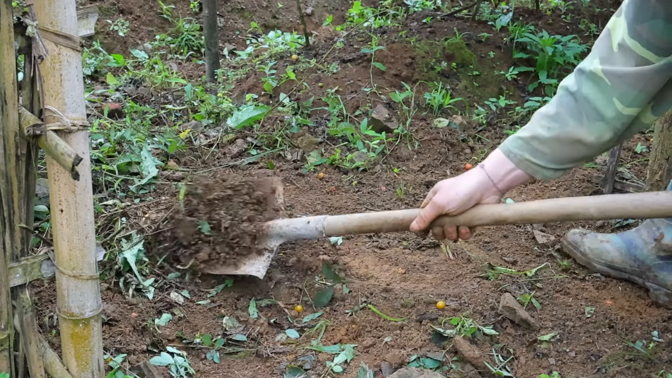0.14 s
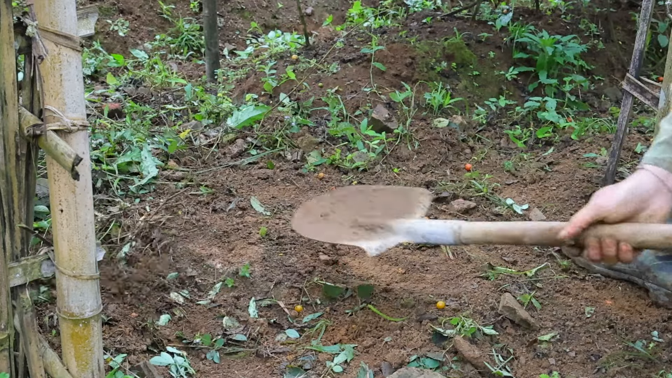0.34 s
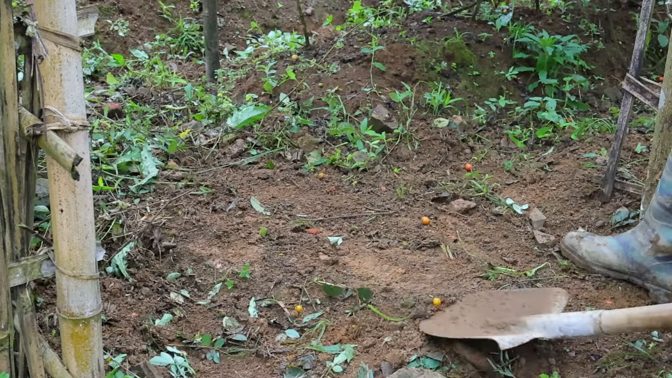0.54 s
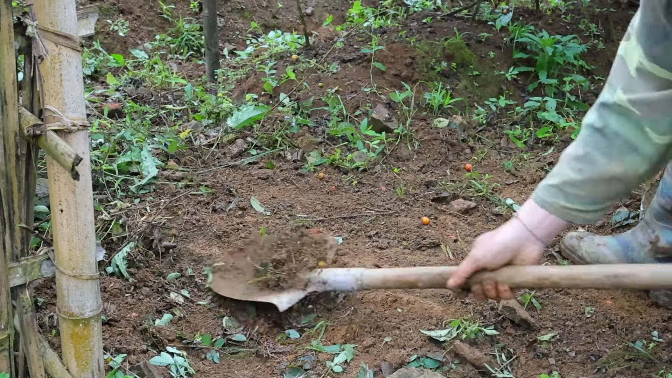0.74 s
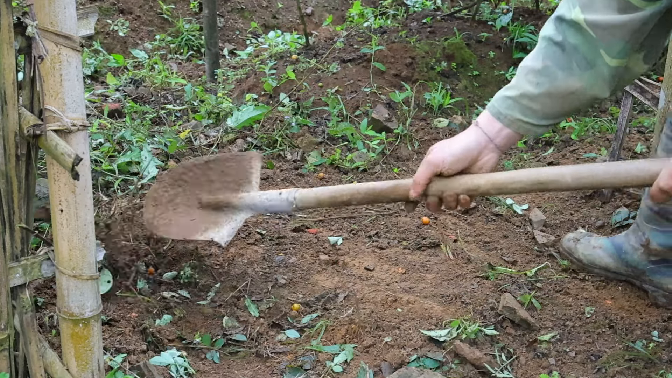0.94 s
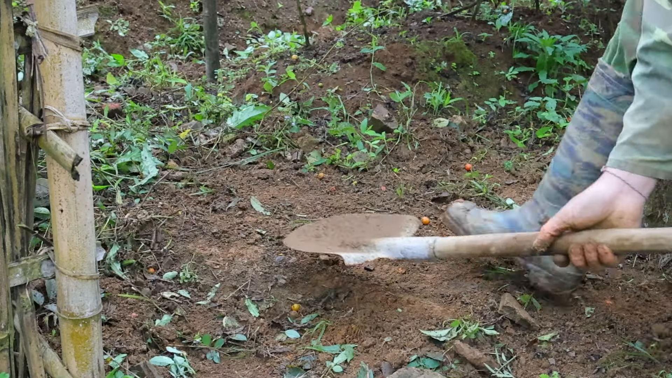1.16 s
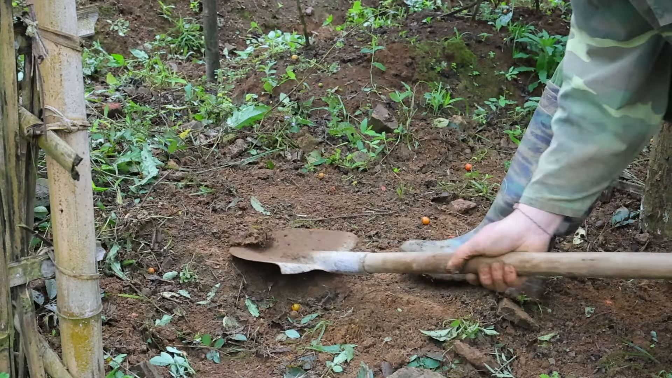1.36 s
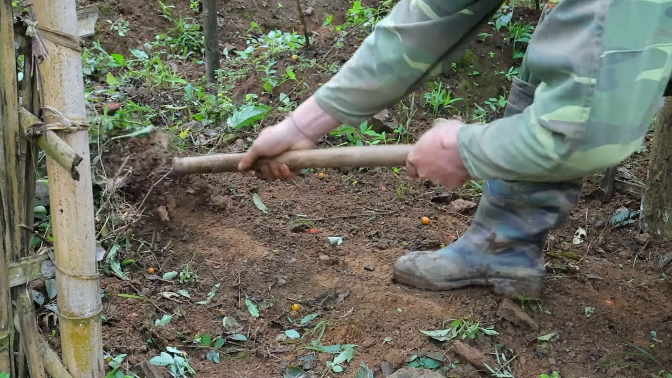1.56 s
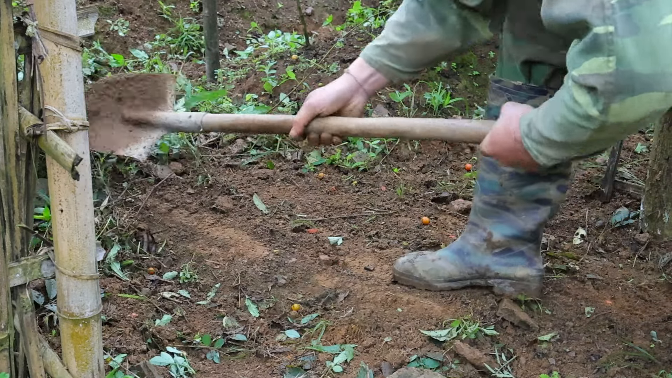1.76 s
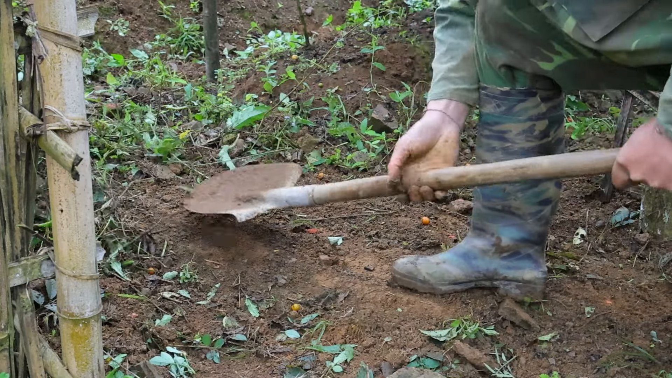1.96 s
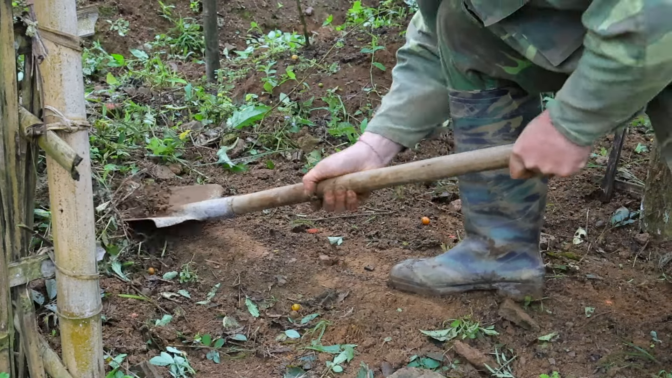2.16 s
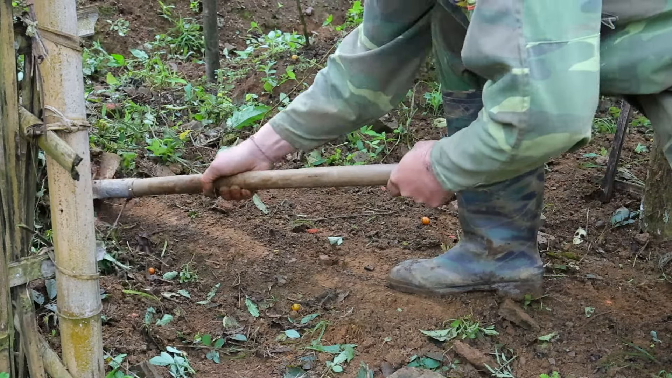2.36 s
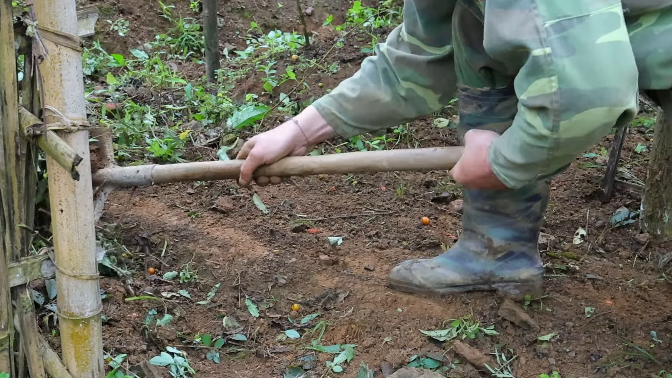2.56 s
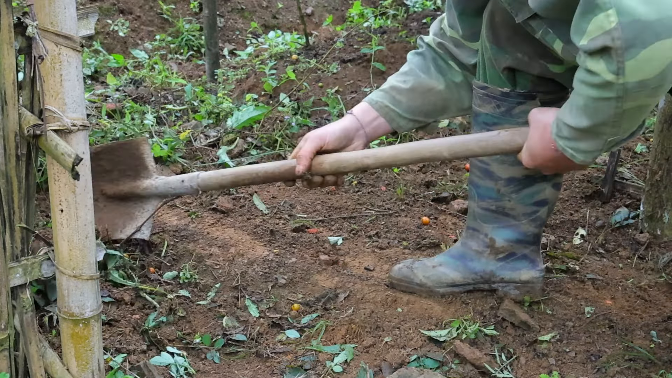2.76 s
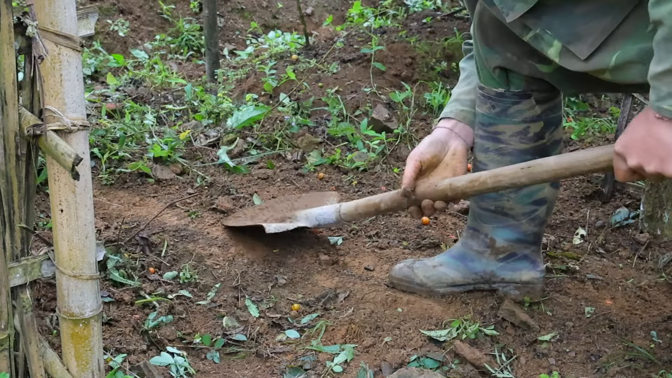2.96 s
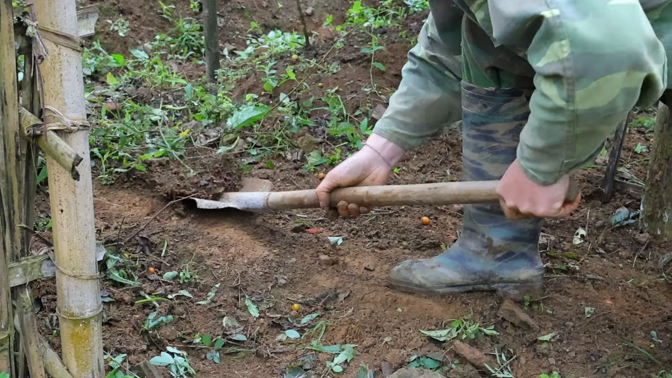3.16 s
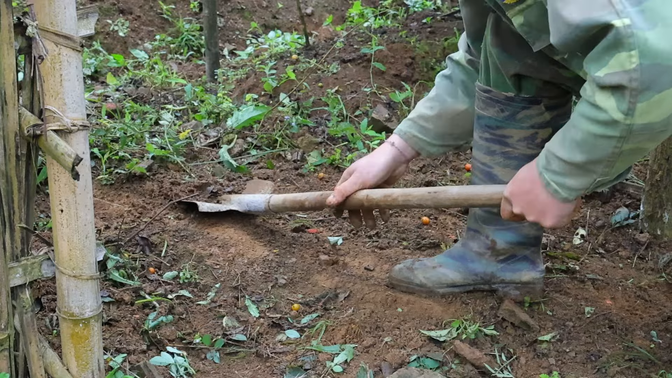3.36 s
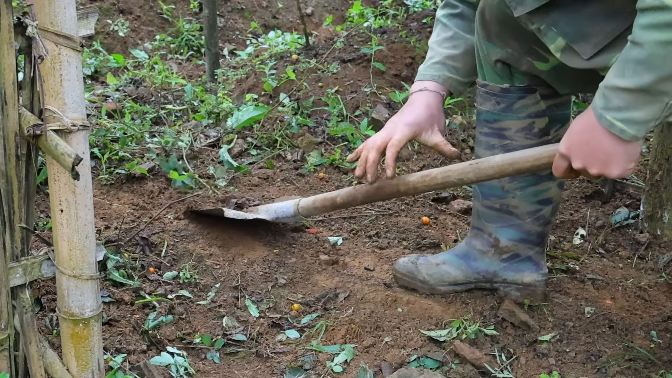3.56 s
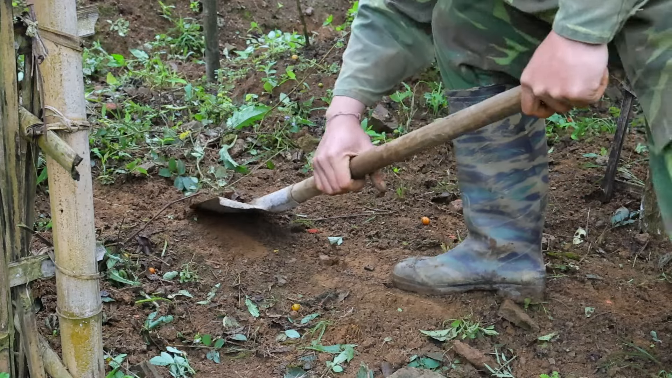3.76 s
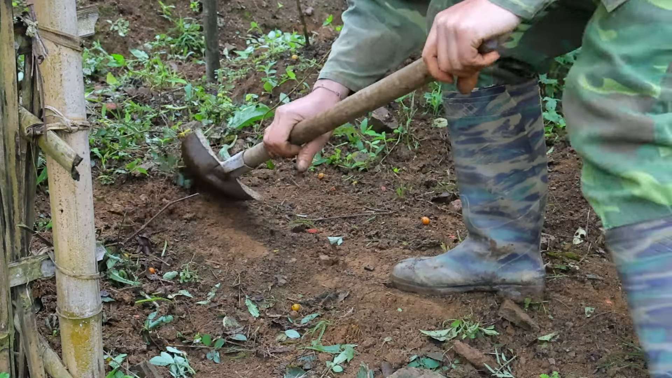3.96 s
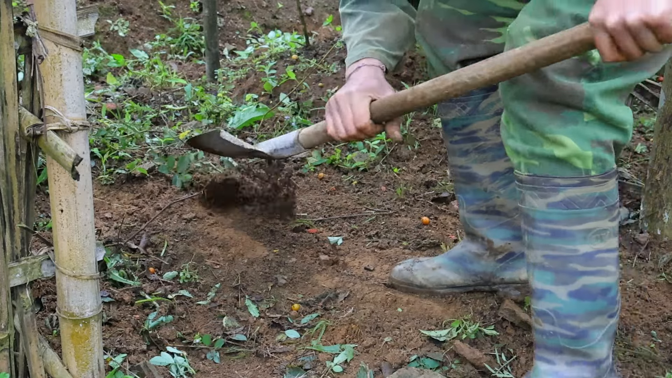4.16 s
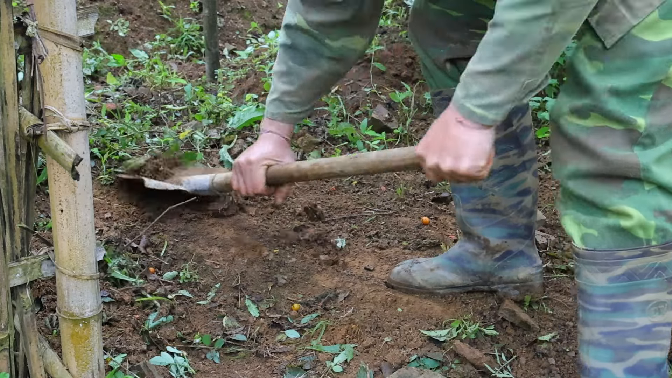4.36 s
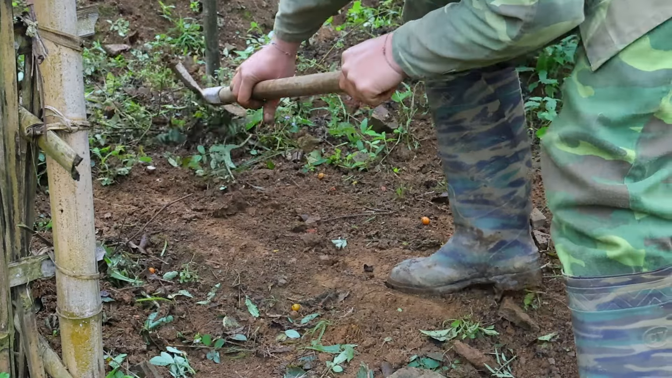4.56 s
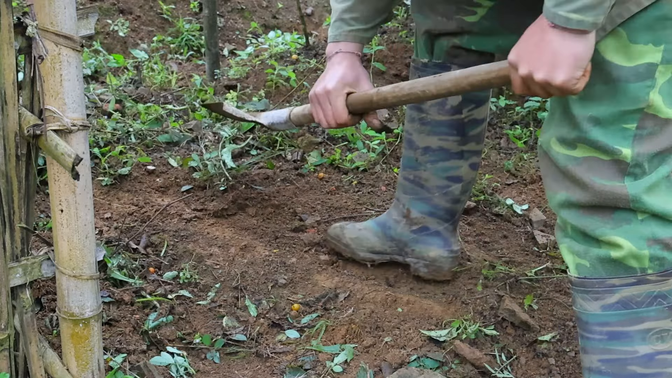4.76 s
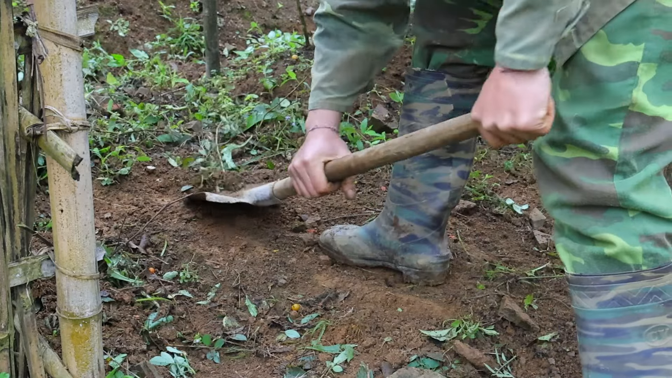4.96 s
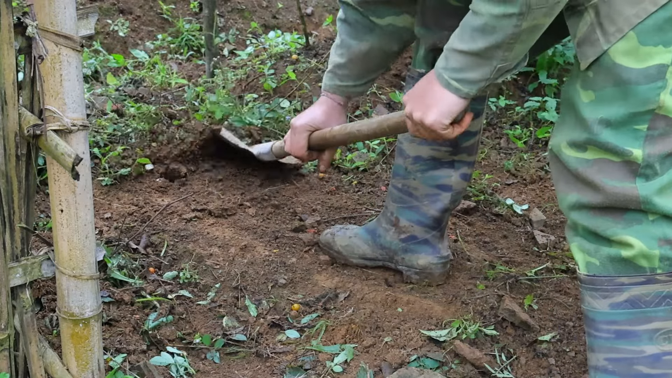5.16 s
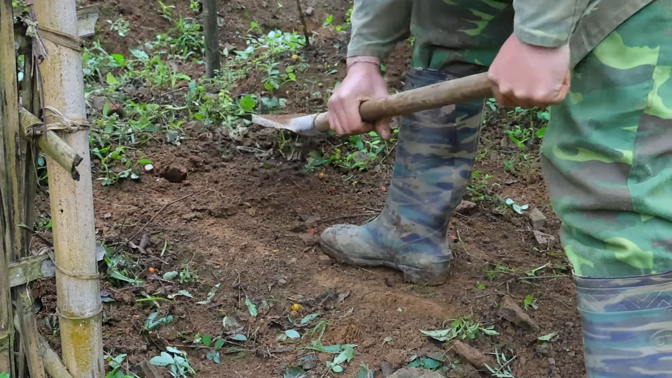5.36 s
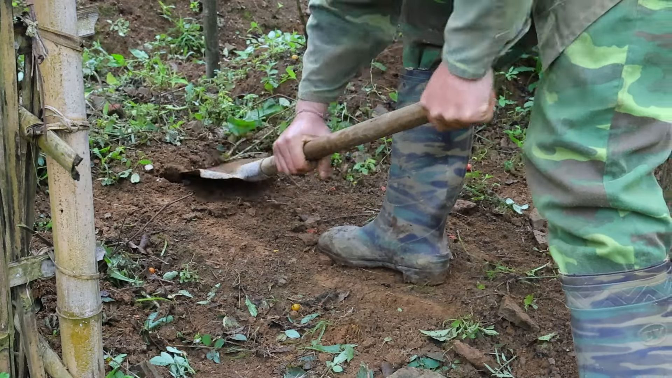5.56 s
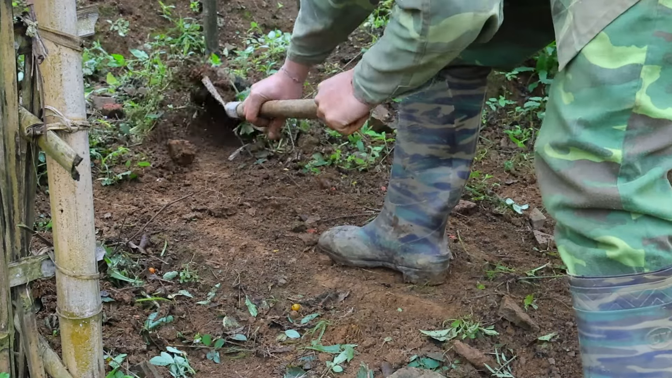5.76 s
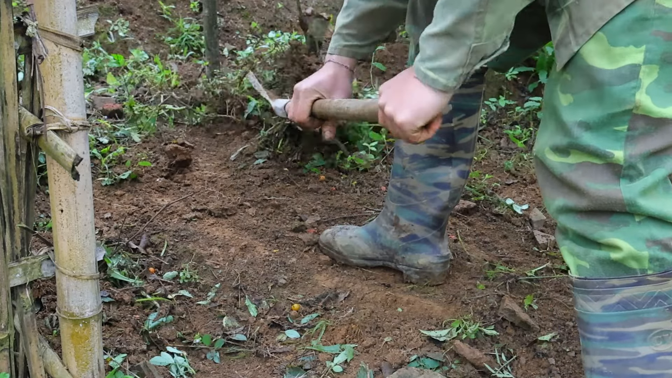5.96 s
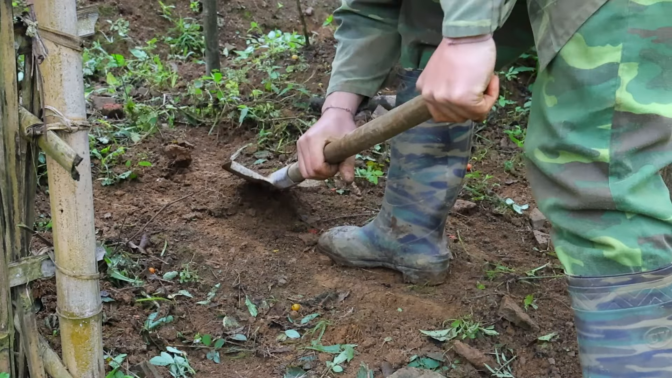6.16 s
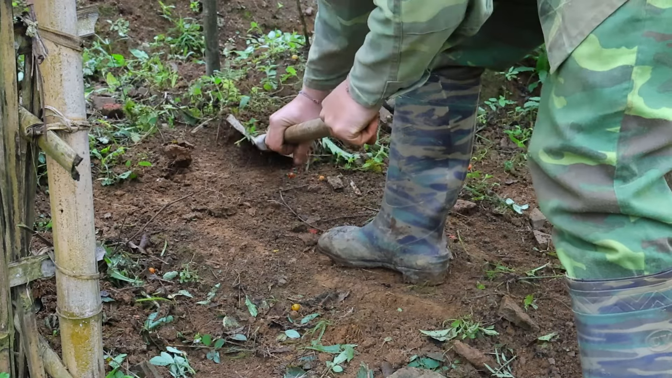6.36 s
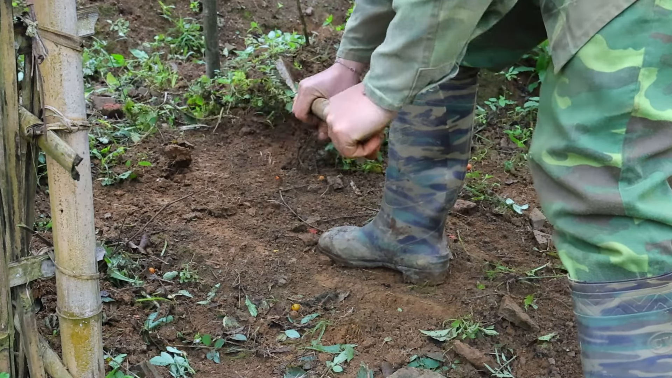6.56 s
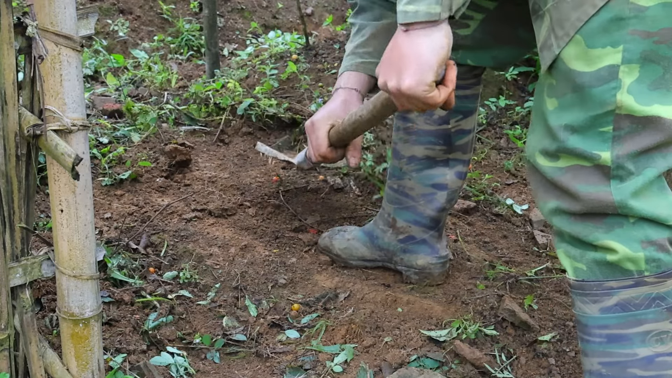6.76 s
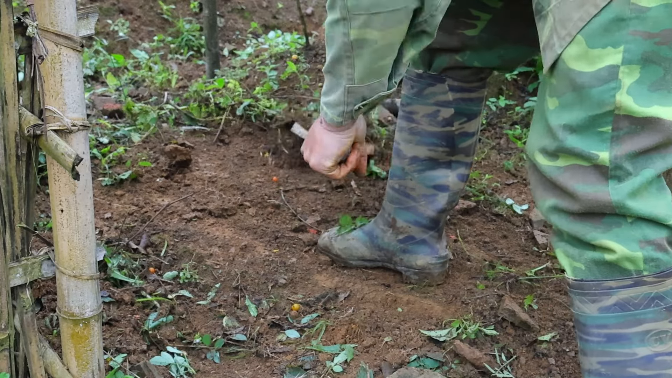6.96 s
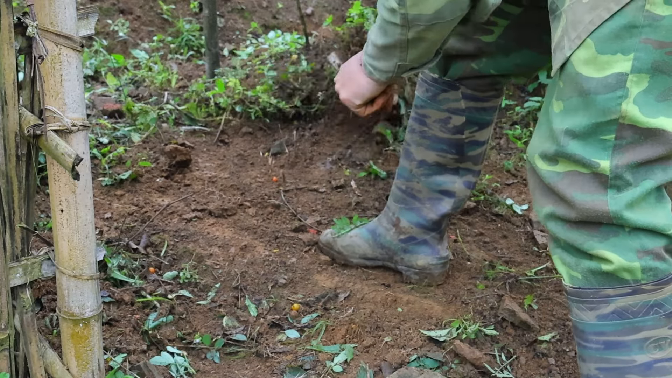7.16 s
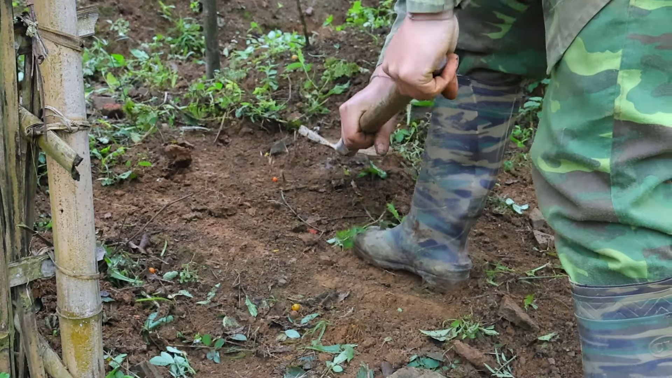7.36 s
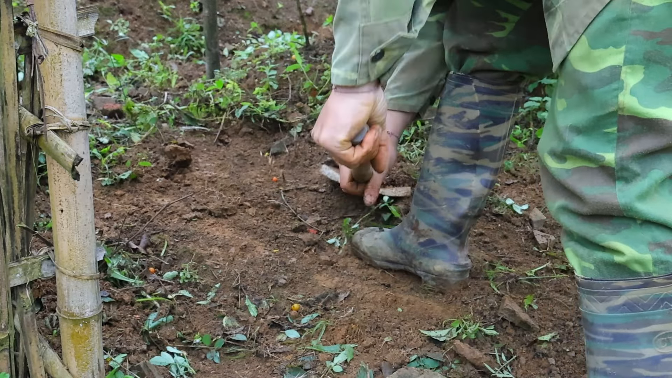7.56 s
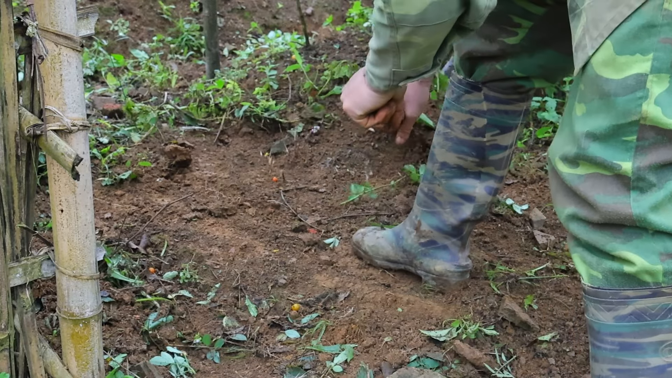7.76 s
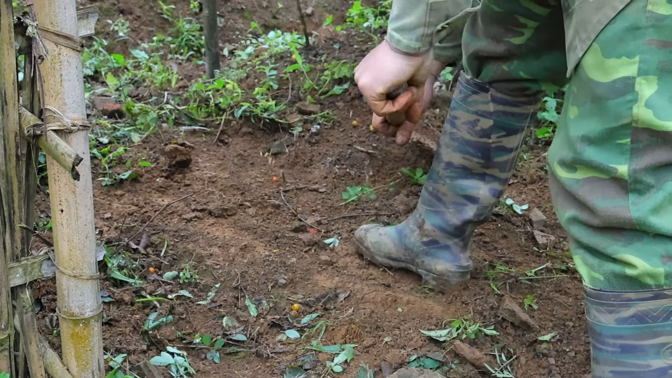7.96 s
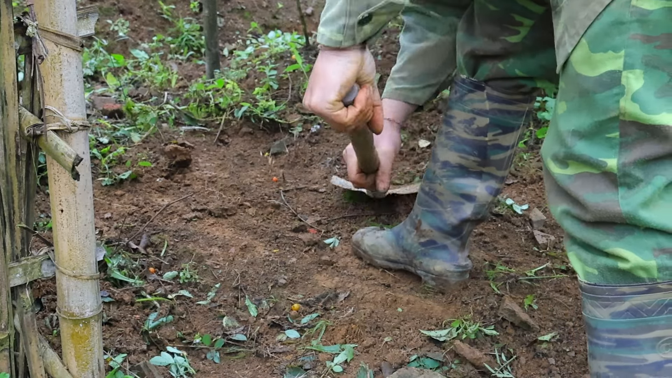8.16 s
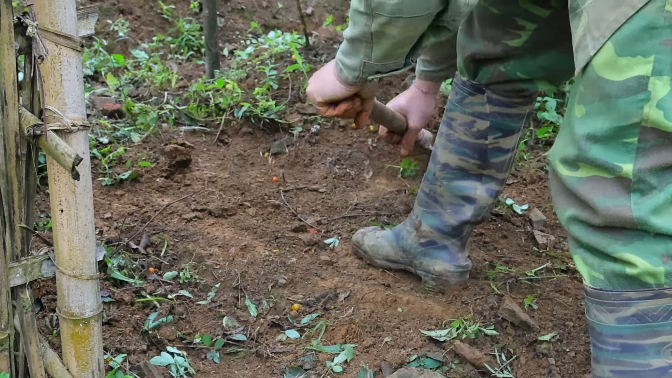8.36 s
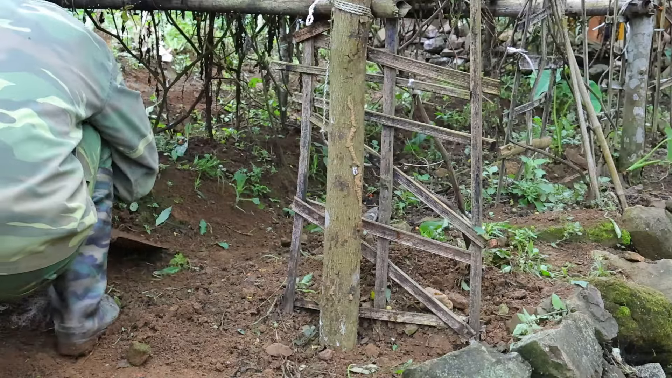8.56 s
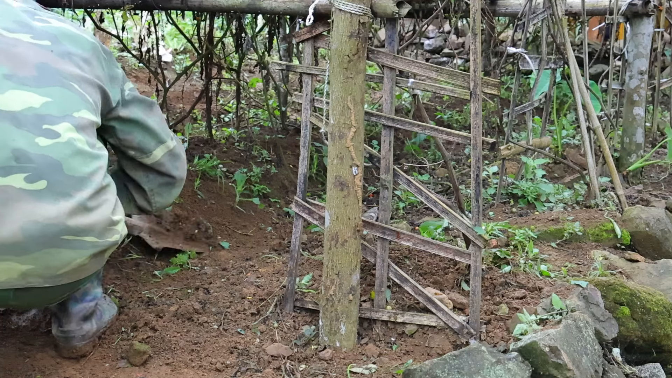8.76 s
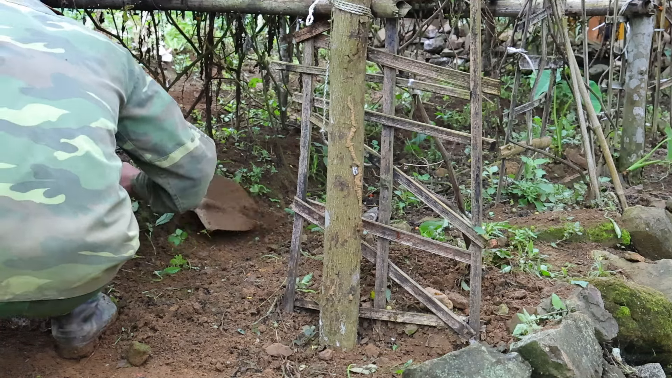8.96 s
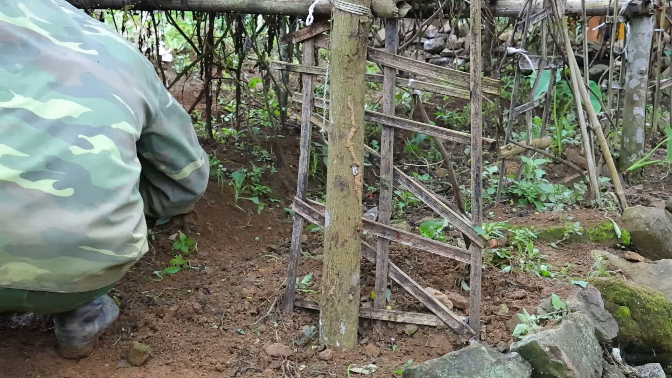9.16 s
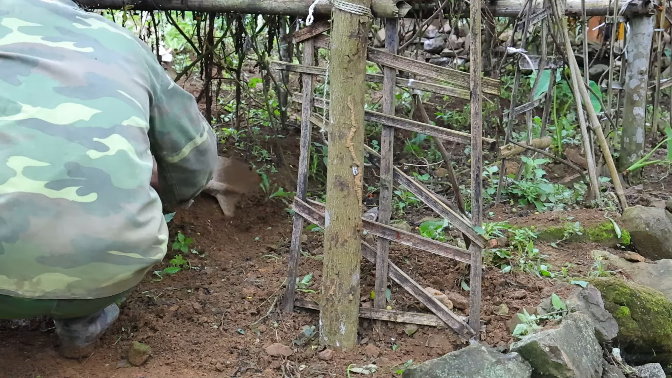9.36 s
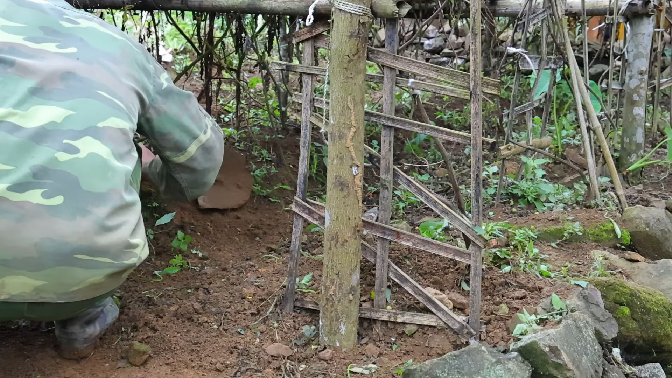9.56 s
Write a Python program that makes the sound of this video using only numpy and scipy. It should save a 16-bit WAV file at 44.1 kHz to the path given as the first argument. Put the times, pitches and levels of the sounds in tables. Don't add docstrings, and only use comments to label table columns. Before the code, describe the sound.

A close stereo microphone hears a spade or hoe working a quiet garden bed. Longer scrapes come first, with stones cracking and the freed blade ringing briefly, then shorter, harder chops, each a crunch with a damped metallic knock. Loose leaves and crumbs rustle in the gaps, rubber boots creak and step, and a faint low drone passes far away. The last strokes are lighter, with a small bright clank against rock.

```python
import sys
import numpy as np
from scipy import signal
from scipy.fft import rfft, irfft, next_fast_len
from scipy.io import wavfile
from scipy.ndimage import uniform_filter1d

SR = 44100
rng = np.random.default_rng(int(sys.argv[2]) if len(sys.argv) > 2 else 0)


def log_audio(samples):
    frames = np.atleast_2d(samples).T
    limited = np.clip(frames, -1, 1)
    pcm = np.round(limited * 32767).astype(np.int16)
    wavfile.write(sys.argv[1], SR, pcm)


def how_loud(loudness_db):
    steps = np.asarray(loudness_db, float) / 20
    return 10 ** steps


N = 423801

# [pitch_hz, level_db]
GARDEN_SPECTRUM = [(24, -38), (40, 27), (91, -2.5), (455, 7.5), (697, -34), (918, 6), (2000, -4),
                   (5580, -18), (11000, -22), (13100, -14.5), (15800, -7)]
# [time_s, level_db]
GROUND_RUMBLE = [
    (0.0, -55.5),
    (3.77, -59),
    (5.81, -50),
    (6.05, -58.5),
    (6.45, -48.5),
    (6.69, -60.5),
    (7.79, -57),
    (8.94, -63.5),
    (9.61, -61),
]
# [start_s, peak_db, pitch_hz, t60_s]
BOOT_THUDS = [(0.604, -26.5, 284, 0.11), (1.324, -31, 110.4, 0.077), (3.246, -30.5, 112, 0.1),
              (4.227, -17, 157, 0.045), (4.237, -24, 272, 0.044), (1.636, -25.5, 70, 0.029),
              (2.14, -35, 65, .1), (4.439, -18.5, 117, 0.047), (5.68, -25, 56, 0.13),
              (4.901, -31.5, 62, 0.14), (5.113, -23.5, 112, 0.091), (8.396, -27, 277, 0.083)]
# [strongest_s, level_db, swell_s over 20 dB]
BOOT_CREAKS = [(.3, -48.5, 2.5), (.968, -46, .5), (2.95, -49.5, 2), (3.268, -48.5, -1), (3.55, -49, 0.5),
               (3.93, -44.5, 0.6), (4.19, -37, -0.37), (4.37, -37.5, 0.07), (4.555, -40.5, 0.14),
               (4.88, -41.5, 0.26), (5.198, -46, 0.7), (5.788, -32, -0.07), (6.385, -44.5, 0.5),
               (6.72, -38, -0.04), (7.418, -44, 0.3), (7.517, -42, 0.05), (7.84, -42, 0.2),
               (8.17, -50, 0.2), (8.73, -49, 1.5), (9.6, -48.5, 1)]
# [start_s, peak_db]
FALLING_CLODS = [(0.615, -7), (0.87, -18), (1.633, -24), (3.925, -19), (4.226, -22), (4.472, -5),
                 (4.496, -20), (5.111, -10), (5.666, -19.5), (6.427, -15), (6.957, -28.5), (7.014, -20),
                 (7.091, -21), (7.643, -17), (7.682, -7.5), (7.75, -17.5), (8.255, -25), (8.359, -20.5),
                 (8.409, -11), (8.563, -28.5), (9.57, -21)]
# [strongest_s, level_db, swell_s over 20 dB, sand_db re level]
LOOSE_RUSTLES = [(.19, -48, 0.4, 0.5), (.3, -56.5, 0.3, 1), (.48, -56, -0.05, 8), (1.158, -46, -0.01, 10.5),
                 (1.36, -56.5, 0.6, 4), (1.9, -52, 0, -9), (2.5, -50.5, 3.5, -1.5), (2.88, -47, 0, -1),
                 (3.454, -43, 0, 4), (3.65, -43.5, 0.07, 4.5), (3.82, -44, 0.2, 4),
                 (4.4, -42.5, 0.26, -8.5), (4.6, -53, 0.3, 8.5), (4.889, -52.5, 0.1, 10),
                 (5.25, -50, 0.7, -2), (6.1, -55.5, 1.12, 9), (7.3, -54, 1.1, 4), (8.03, -46.5, 0, -31.5),
                 (8.47, -50, -0.11, 0), (8.54, -42, -0.21, -2), (8.873, -47, 0.3, -2)]
# [strongest_s, level_db, rise_s and fall_s over 20 dB, sand_db re level]
BLADE_STROKES = [(0, -25, .05, 0.078, -5), (.624, -54, 0.027, 0.15, -23), (.708, -36.5, 0.077, 0.22, -2),
                 (.793, -36.5, 0.43, 0.052, -4), (0.892, -40, 0.27, 0.28, -3.5),
                 (1.44, -38, 0.017, 0.63, -7), (1.533, -31.5, 0.091, 0.065, 4.5),
                 (1.65, -36.5, 0.2, 0.14, 3.5), (2.305, -30, 0.22, 0.21, -2.5),
                 (3.167, -26.5, 0.042, 0.14, -8.5), (3.254, -29.5, 0.2, 0.029, -3),
                 (3.917, -39, 0.056, 0.21, 0), (4.478, -30, 0.086, 0.14, -4),
                 (5.114, -25.5, 0.044, 0.068, -10.5), (5.695, -28.5, 0.03, 0.14, 0.5),
                 (6.43, -30.5, 0.19, 0.067, -1), (7.025, -28.5, 0.11, 0.13, -5.5),
                 (7.676, -25.5, 0.042, 0.081, -4.5), (7.767, -33.5, 0.069, 0.11, -8),
                 (8.312, -23, 0.029, 0.039, 4), (8.409, -35.5, 0.25, 0.21, -1.5),
                 (9.224, -37, 0.027, 0.24, -9), (9.364, -45.5, 0.033, 0.22, 2),
                 (9.5, -40.5, 0.077, 0.052, -2.5)]
# [pitch_hz, level_db]
GRIT_SPECTRUM = [(150, -68), (250, 4.5), (654, 5), (865, -5.5), (1080, 7.5), (2020, 7), (2830, 2),
                 (5370, -4.5), (7000, -15.5), (9100, -26), (15400, -120)]
# [pitch_hz, level_db]
SAND_SPECTRUM = [(3530, -7.5), (6000, -3.5), (7250, -6), (11100, -5), (12200, -4.5), (14900, 7),
                 (16000, -20)]
# [start_s, peak_db, pitch_hz, t60_s]
SINGING_TOUCHES = [(.28, -36, 680, 0.067), (.305, -40, 2020, 0.16), (.62, -16, 3020, 0.049),
                   (.62, -16, 2036, 0.08), (.679, -29, 3750, 0.038), (.699, -9, 3850, 0.061),
                   (.965, -42, 2040, 0.24), (1.39, -44, 2010, .3), (1.495, -22.5, 1990, 0.26),
                   (1.98, -37, 760, 0.085), (2.313, -5.5, 2130, 0.036), (3.11, -38, 646, .1),
                   (3.235, -12.5, 894, 0.08), (3.485, -39, 696, 0.073), (4.155, -35, 708, 0.27),
                   (4.463, -7, 4200, 0.037), (4.498, -18, 853, 0.1), (4.549, -31, 1990, .1),
                   (4.609, -36, 2010, 0.15), (4.749, -28, 2730, 0.045), (5.051, -31, 1990, 0.09),
                   (5.083, -18, 3090, 0.066), (5.197, -35, 2070, .15), (5.246, -31, 2116, 0.063),
                   (5.404, -32.5, 764, 0.077), (5.112, -10, 1660, 0.048), (6.4275, -9, 1940, 0.037),
                   (7.028, -10, 1250, 0.063), (7.0905, -8, 1940, 0.034), (7.185, -42, 993, 0.23),
                   (7.32, -43, 710, .15), (6.4026, -1.5, 1855, 0.024), (6.43, -21, 855, 0.073),
                   (6.715, -39, 850, 0.13), (.744, -21, 13500, 0.034), (6.972, -18, 2053, 0.13),
                   (6.99, -26, 2070, 0.12), (8.295, -11, 1343, 0.12), (8.315, -17.5, 1990, 0.092),
                   (8.256, -24, 2030, .04), (8.563, -25.5, 3080, 0.053), (8.57, -26.5, 1570, 0.12),
                   (9.26, -35, 2180, 0.15), (9.41, -40, 2030, .1), (9.443, -40, 984, .12),
                   (9.38, -36.5, 616, 0.074), (9.494, -30.5, 580, 0.055)]
# [start_s, peak_db, pitch_hz]
GRAIN_SNAPS = [(0.136, -13, 3050), (0.7668, -7, 3270), (0.8676, -8, 3480), (2.3391, -1, 5260),
               (2.3846, -10, 1510), (2.424, -14, 1990), (2.661, -28.5, 2200), (2.8554, -25, 1820),
               (3.158, -5, 5500), (4.2268, -16, 1300), (4.7487, -28.5, 1200), (4.8749, -22, 1240),
               (4.9012, -22, 1790), (5.0633, -8, 4000), (5.082, -4, 4500), (6.329, -30, 5000),
               (6.383, -17, 5000), (6.393, -17, 5200), (.7995, -15, 11500), (6.448, -16, 6550),
               (7.0923, -7, 5700), (7.6467, -5, 5830), (8.4163, -2, 4270), (8.4105, -6, 1700),
               (9.2152, -8.5, 4560), (9.342, -29, 4500), (9.512, -27, 6000)]
# [pitch_hz, level_db, t60_s]
LIFTED_MODES = [(538, -20, .36), (700, -22, .27), (856, -14, .23), (1254, -4, .27), (2810, -19, .09),
                (1480, -3.5, .09), (1723, -14, .18), (1965, -13, .2), (2083, -12, .06), (2250, -12, .13),
                (3580, -8, .09)]
# [pitch_hz, level_db, t60_s]
ROCK_MODES = [(1050, -8, .03), (1556, -15, .06), (2073, -2, .09), (2180, -8, .04), (2450, -18, .08),
              (2853, -19, .06), (4200, -6, .035)]
# [start_s, level_db]
AIR_RINGS = [
    (0.623, -26.5),
    (.869, -5.5),
    (9.2153, -5),
]
# [pitch_hz, width_hz, level_db]
BURIED_MODES = [(540, 35, -44), (885, 7.9, -5.5), (1343, 42, -2), (2070, 100, -6.5), (2950, 47, -4),
                (3320, 290, 12.5), (4463, 270, 11), (5488, 57, 2), (7850, 110, -49.5)]
# [pitch_hz, width_hz, level_db]
SPINE_MODES = [(2030, 60, -6), (2120, 60, -9)]
# [time_s, level_db]
BLADE_CLEANNESS = [(0, 3), (.6, -0.5), (1.75, -8), (2.2, -2), (3.1, -8.5), (9.1, -8), (9.2, 4), (9.61, -7)]
# [start_s, peak_db, pitch_hz, crack_db re peak, t60_s]
STONE_BLOWS = [(0.0135, -6, 3320, -10, 0.12), (0.0267, -4, 3250, -30, 0.016),
               (0.6172, -8, 2000, -26, 0.036), (0.6996, -6, 3720, 7.5, 0.16),
               (0.8737, -8.5, 1580, -27, 0.026), (1.5294, -5.5, 1910, 6.5, 0.13),
               (1.634, 1.5, 2100, -40, 0.081), (2.293, -4, 5000, -27, 0.051), (2.3396, -9, 1860, 0, 0.14),
               (3.181, -5, 1860, -20, 0.028), (3.235, -2.5, 1840, 1, 0.053),
               (4.4633, -1.5, 1630, -14, 0.085), (5.0745, -1, 1760, -16, 0.053),
               (5.1182, -2.5, 1870, -7.5, 0.03), (5.6838, -5.5, 1680, 11, 0.11),
               (6.4278, -10.5, 1950, -2, 0.098), (7.0165, -5, 1590, 1, 0.059),
               (7.0285, -8, 1270, -24, 0.066), (7.0904, -8.5, 1840, 2, 0.058),
               (7.6463, -3, 1820, -29, 0.05), (7.6807, -2, 2070, 4.5, 0.059), (8.2985, -9.5, 3660, 4, 0.12),
               (8.4135, -1.5, 3960, 7, 0.061), (9.2145, -13, 4360, 0, 0.082)]
# [start_s, peak_db, pitch_hz, crack_db re peak]
STROKE_PEBBLES = [(0.1385, -10, 2970, 6.5), (0.713, -27, 3700, -11), (0.743, -13, 1730, -1),
                  (0.7666, -10, 2450, 2), (0.802, -15, 2060, -11), (1.494, -11, 2000, -23),
                  (1.577, -14.5, 2160, 8), (1.6097, -13.5, 2100, 3), (2.2428, -13, 2500, -4),
                  (2.3126, -10, 2080, -13), (2.3832, -17, 1480, -33), (2.4258, -18.5, 2070, -15),
                  (3.15, -7.5, 5500, 4.5), (3.158, -11.5, 2400, -10.5), (3.1679, -6.5, 3480, 5),
                  (3.203, -10.5, 1730, -10), (3.9245, -17.5, 1570, -16), (4.4348, -12.5, 2270, 11),
                  (5.0629, -8, 2050, -18), (5.084, -6, 3100, -15), (5.665, -12, 2380, -27),
                  (5.7346, -13, 1990, 0), (6.3466, -14, 1930, -3), (6.3763, -13.5, 1980, -18),
                  (6.394, -9, 1950, -1), (6.9598, -8.5, 1820, -2), (7.741, -12, 1610, -18),
                  (7.7498, -20, 2010, -23), (7.783, -14.5, 1600, -22), (8.5642, -19, 1660, -6)]
# [start_s, peak_db, pitch_hz]
FALLING_CRUMBS = [(0.0939, -22.5, 2070), (0.6786, -24.5, 1950), (1.479, -20.5, 2050), (1.6858, -18.5, 1790),
                  (1.872, -34, 1140), (2.1302, -28, 4030), (2.19, -24.5, 2400), (2.511, -20.5, 1850),
                  (2.5561, -23, 2070), (2.6615, -26.5, 1530), (2.802, -27.5, 1940), (2.8557, -24, 1590),
                  (3.8904, -21.5, 4230), (4.225, -32, 1300), (4.75, -31, 2720), (4.8752, -30, 1290),
                  (4.901, -31.5, 1680), (5.196, -24.5, 1990), (6.329, -23, 1900), (7.004, -15, 2110),
                  (7.829, -23.5, 2000), (8.256, -22, 1900), (8.8717, -22.5, 3900), (8.93, -31.5, 2480),
                  (9.279, -25.5, 2150), (9.342, -36, 4510), (9.365, -26, 3350), (9.471, -32, 5100),
                  (9.298, -25, 2600), (3.464, -27.5, 2250)]
# [start_s, peak_db, pitch_hz, crack_db re peak, t60_s]
STONE_CHIPS = [(.005, -10.5, 4000, -8, 0.062), (.035, -15, 1430, -10, 0.022), (.7135, -19, 2980, 6, .012),
               (.811, -16, 3200, 0, 0.026), (7.034, -6, 2800, -7, 0.038), (1.527, -7, 4460, -3.5, 0.076),
               (1.539, -4.5, 4630, -1, 0.025), (1.654, -12, 3000, -6, .03),
               (2.2375, -17.5, 4400, 8.5, 0.012), (2.2485, -11.5, 4540, 2, 0.056),
               (2.305, -13, 5500, 0, 0.027), (2.4853, -32.5, 1490, -26, 0.13), (9.357, -29, 3800, -5, .06),
               (3.255, -23, 2780, -3, 0.026), (3.7274, -31.5, 4500, 9.5, 0.047),
               (3.9215, -17, 4570, 3.5, 0.034), (4.237, -31, 1510, -10, 0.026),
               (4.473, -11, 4300, -16, 0.02), (4.4975, -12.5, 2580, -5, 0.04),
               (6.4235, -12, 4500, -8, 0.08), (4.5481, -31, 3200, -10, .04), (4.617, -34, 5240, 13, 0.017),
               (5.0509, -32, 3100, -15, 0.031), (5.109, -12, 5730, 0, 0.052),
               (5.2525, -32.5, 2190, -3, 0.031), (5.727, -20, 7000, 5, 0.033),
               (5.751, -19.5, 5200, 5, 0.024), (5.786, -24, 1870, -5, 0.086), (6.2791, -34, 4130, 3, 0.026),
               (6.3046, -25, 1800, -4, 0.062), (6.973, -15, 1390, -10, 0.065),
               (7.1207, -24.5, 4970, -7, 0.037), (7.6335, -28, 2070, -10, .04),
               (7.6765, -11, 3300, 3, 0.052), (7.691, -6.5, 5430, 2.5, 0.03),
               (9.492, -33, 5400, -10, 0.088), (8.283, -29, 6500, 3, 0.044),
               (8.294, -10.5, 1350, -11, 0.11), (8.377, -22.5, 7100, 13, 0.092),
               (8.5704, -23.5, 4930, 4, 0.055)]
# [pitch_hz, side_db]
STEREO_SCATTER = [(60, -13), (700, -17.5), (1500, -13.5), (3000, -3.5), (6000, -1.2), (15000, -1.2)]
# [pitch_hz, balance_db]
STEREO_TILT = [(700, -1.2), (2500, -4.5), (5000, -1)]
# [pitch_hz, gain_db]
MIC_RESPONSE = [(20, -32), (70, -5), (9000, -2), (11000, -4.5), (11350, -12.5), (11700, -3), (16000, -19),
                (16400, -48)]


def evened(x):
    return x / np.sqrt(np.mean(x ** 2) + 1e-20)


def read(points, hz):
    f, value = np.transpose(points)
    return np.interp(np.log(hz + 1), np.log(f + 1), value)


def curve(rows):
    s, db = np.transpose(rows)
    return np.interp(np.arange(N) / SR, s, db)


def add(mix, s, sound):
    part = mix[max(round(s * SR), 0):][:len(sound)]
    part += sound[:len(part)]


def decay(t, t60, shortest, longest):
    return how_loud(-60 * t / np.clip(t60, shortest, longest))


def resonate(x, hz, width):
    r = np.exp(-np.pi * width / SR)
    pole = r * np.exp(2j * np.pi * hz / SR)
    return 2 * signal.lfilter([1 - r], [1, -pole], x).real


def equalised(x, points):
    count = x.shape[-1]
    size = next_fast_len(count)
    gain = how_loud(read(points, np.fft.rfftfreq(size, 1 / SR)))
    return irfft(rfft(x, size) * gain, size)[..., :count]


def coloured(x, points):
    return evened(equalised(x, points))


def lumps(seconds, depth_db):
    size = max(round(seconds * SR), 1)
    wander = uniform_filter1d(uniform_filter1d(rng.standard_normal(N), size), size)
    return how_loud(depth_db * evened(wander))


def grains(per_s, spread_db, seconds):
    size = how_loud(spread_db * np.minimum(rng.exponential(1, N), 5))
    hits = size * (rng.random(N) < per_s / SR)
    envelope = signal.lfilter([1], [1, -np.exp(-1 / (seconds * SR))], hits)
    return evened(envelope * rng.standard_normal(N))


def patchy(x, depth_db):
    z = signal.stft(x, nperseg=256)[2]
    field = rng.standard_normal(z.shape[::-1])
    field = uniform_filter1d(uniform_filter1d(field, size=9, axis=0), size=6, axis=1)
    return evened(signal.istft(z * how_loud(depth_db * evened(field).T), nperseg=256)[1][:N])


def swells(s, db, rise, fall, still_db):
    t = np.arange(0, N / SR + .002, .002)[:, None]
    before = (s - t) / np.maximum(rise, .01)
    after = (t - s) / np.maximum(fall, .01)
    power = (how_loud(db - 20 * np.maximum(before, after)) ** 2).sum(1) + how_loud(still_db) ** 2
    return np.interp(np.arange(N) / SR, t[:, 0], 10 * np.log10(power))


def air():
    return how_loud(-54.5) * coloured(rng.standard_normal(N) * lumps(.15, 1.2), GARDEN_SPECTRUM)


def passing_drone():
    swell = np.exp(-((np.arange(N) / SR - 5.68) / 0.37) ** 4)
    return how_loud(-52.5) * swell * evened(resonate(rng.standard_normal(N), 171, 9.2))


def ground_rumble():
    tremble = rng.standard_normal(N) * lumps(.05, 2.5)
    return how_loud(curve(GROUND_RUMBLE)) * evened(resonate(resonate(tremble, 120, 170), 120, 200))


def boot_creaks():
    slips = grains(500, 3.0, .006) * lumps(.02, 2.5)
    hollow = resonate(resonate(slips, 612, 203), 826, 500)
    squeaks = sum(resonate(grains(25, 3.5, .025), hz, 45) for hz in (650, 720, 800))
    s, db, swell = np.transpose(BOOT_CREAKS)
    level_db = swells(s, db, swell, swell, still_db=-62.5)
    return how_loud(level_db) * evened(evened(hollow) + evened(squeaks))


def boot_thuds():
    out, t = np.zeros(N), np.arange(SR // 4) / SR
    for s, db, hz, t60 in BOOT_THUDS:
        tone = np.sin(2 * np.pi * hz * t) * (1 - np.exp(-t / 0.0014))
        add(out, s, how_loud(db) * decay(t, t60, .02, .25) * tone)
    return out


def clods():
    out, t = np.zeros(N), np.arange(6000) / SR
    for s, db in FALLING_CLODS:
        t60 = .025 - .0048 * db
        thump = resonate(resonate(rng.standard_normal(len(t)), 558, 485), 1060, 1160)
        thump = thump * decay(t, t60, .01, .2) * (1 - np.exp(-t / 0.000082))
        add(out, s, how_loud(db) * thump / abs(thump).max())
    return out


def effort():
    rustles = [(s, db, swell, swell, sand_db) for s, db, swell, sand_db in LOOSE_RUSTLES]
    s, db, rise, fall, sand_db = np.transpose(BLADE_STROKES + rustles)
    level_db = swells(s, db, rise, fall, still_db=-69)
    return level_db, swells(s, db + sand_db, rise, fall, still_db=-71) - level_db


def scrape():
    level_db, sand_db = effort()
    coarse = np.clip((level_db + 54) / 22, .2, 1)
    crackle = evened(grains(1300, 3.4, .0011) * lumps(.008, 2.4))
    drive = patchy(coarse * crackle + (1 - coarse) * rng.standard_normal(N), 2.8)
    steel = sum(how_loud(db) * evened(resonate(drive, hz, width)) for hz, width, db in BURIED_MODES)
    grit = evened(coloured(drive, GRIT_SPECTRUM) + .28 * evened(steel))
    return how_loud(level_db) * (grit + how_loud(sand_db) * coloured(drive, SAND_SPECTRUM))


def pings():
    out, t = np.zeros(N), np.arange(8000) / SR
    rise = 1 - np.exp(-t / 0.0013)
    for s, db, hz, t60 in SINGING_TOUCHES:
        pair = np.sin(2 * np.pi * hz * t) + .4 * np.sin(2 * np.pi * 1.045 * hz * t)
        add(out, s, how_loud(db) * decay(t, t60, .02, .5) * pair * rise)
    return out


def snaps():
    out, t = np.zeros(N), np.arange(600) / SR
    for s, db, hz in GRAIN_SNAPS:
        envelope = np.exp(-hz * t / 1.7) * (1 - np.exp(-2 * hz * t))
        add(out, s, how_loud(db + 4.5) * np.sin(2 * np.pi * hz * t) * envelope)
    return out


def free_rings():
    out, t = np.zeros(N), np.arange(SR // 2) / SR
    soft, hard = (LIFTED_MODES, .0035), (ROCK_MODES, .0004)
    for (s, db), (modes, rise) in zip(AIR_RINGS, (soft, soft, hard)):
        ring = np.zeros(len(t))
        for hz, mode_db, t60 in modes:
            ring += how_loud(mode_db - 72 * t / t60) * np.sin(2 * np.pi * (hz * t + rng.random()))
        add(out, s, how_loud(db) * ring * (1 - np.exp(-t / rise)))
    return out


def knocks(stones):
    out, t = np.zeros(N), np.arange(5000) / SR
    hz, width, mode_db = np.transpose(BURIED_MODES)[:, :, None]
    for s, db, pitch, crack_db, t60 in stones:
        crunch_noise, crack_noise, break_noise = rng.standard_normal((3, len(t)))
        strength, detune = rng.standard_normal((2, len(BURIED_MODES), 1))
        crumble = how_loud(3.54 * evened(uniform_filter1d(break_noise, size=60)))
        fall = decay(t, t60, .006, .2) * (1 - np.exp(-t / 0.0018))

        crush = crunch_noise * crumble
        broad = np.diff(resonate(resonate(crush, 1630, 1300), 2260, 1840), prepend=0)
        crunch = (evened(resonate(crush, pitch, .14 * pitch)) + .6 * evened(broad)) * fall

        modes = how_loud(mode_db + 4.5 * strength - 5 * abs(np.log2(hz / pitch)))
        modes = modes * np.sin(2 * np.pi * hz * (1 + 0.0425 * detune) * t)
        modes = modes * np.exp(-.8 * np.pi * width * t)
        body = crunch + 0.57 * modes.sum(0) * np.sqrt(fall)

        crack = resonate(resonate(crack_noise * crumble, 2400, 3700), 4300, 21000)
        crack = evened(np.diff(crack, prepend=0)) * (fall ** 3.6 + 1.55 * np.exp(-t / 0.00073))

        two_cycles = np.sin(np.pi * np.minimum(pitch * t / 2, 1)) ** 2
        tick = 1.6 * np.sin(2 * np.pi * pitch * t) * two_cycles * np.tanh(abs(strength[0]))
        add(out, s, how_loud(db) * (tick + body / abs(body).max() + 0.27 * how_loud(crack_db) * crack))
    return out


def spine(x):
    drive = x * how_loud(curve(BLADE_CLEANNESS))
    hum = sum(how_loud(db) * np.sqrt(400 / width) * resonate(drive, hz, width) for hz, width, db in SPINE_MODES)
    return x + hum


def stereo(dry):
    hz, _, z = signal.stft(dry, SR, nperseg=256)
    random_phase = np.exp(2j * np.pi * rng.random(z.shape))
    side = z * random_phase * how_loud(read(STEREO_SCATTER, hz))[:, None]
    early = np.exp(1j * np.pi * hz * .6 / SR)
    port = (how_loud(read(STEREO_TILT, hz) / 2) * early)[:, None]
    return signal.istft(np.array([z * port + side, z / port - side]), nperseg=256)[1][:, :N]


def scene():
    pebbles = [(*row, 0.069) for row in STROKE_PEBBLES]
    crumbs = [(*row, -29, 0.066) for row in FALLING_CRUMBS]
    stones = STONE_BLOWS + pebbles + crumbs + STONE_CHIPS
    background = air() + passing_drone()
    feet = ground_rumble() + boot_creaks() + boot_thuds()
    blade = spine(scrape() + snaps() + knocks(stones)) + pings() + free_rings()
    return stereo(background + feet + clods() + blade)


def top_cut(x):
    return signal.sosfilt(signal.butter(12, 16400, fs=SR, output="sos"), x)


def record(dry):
    heard = equalised(dry, MIC_RESPONSE)
    return top_cut(np.clip(heard, -1, 1))


dry = scene()
out = record(dry)
log_audio(out)
```